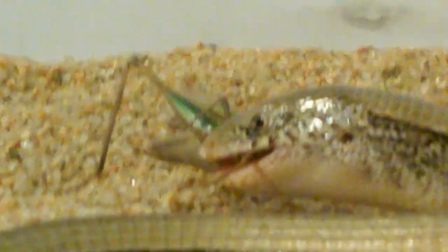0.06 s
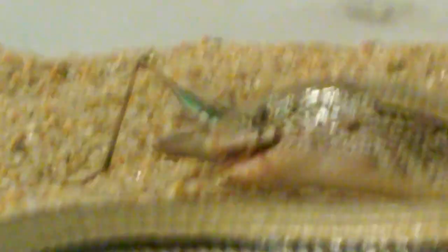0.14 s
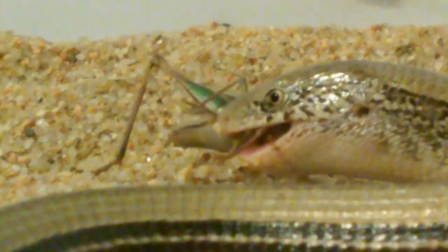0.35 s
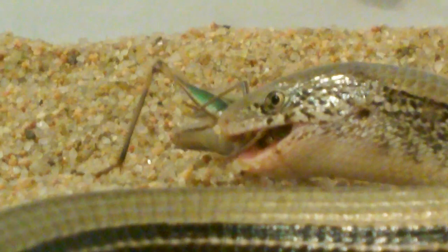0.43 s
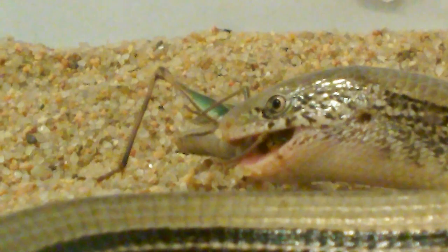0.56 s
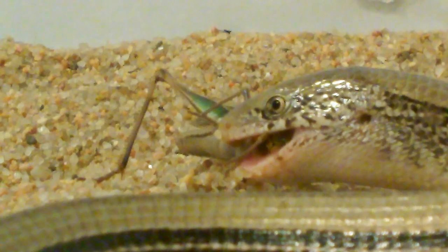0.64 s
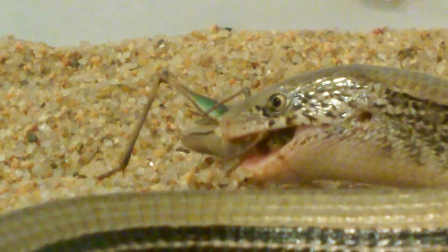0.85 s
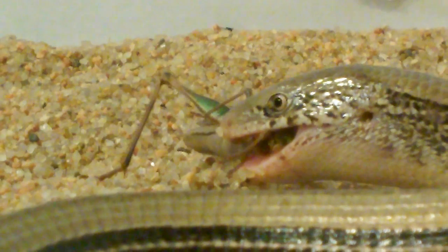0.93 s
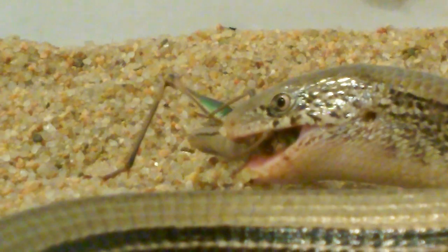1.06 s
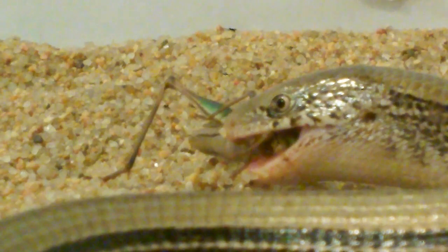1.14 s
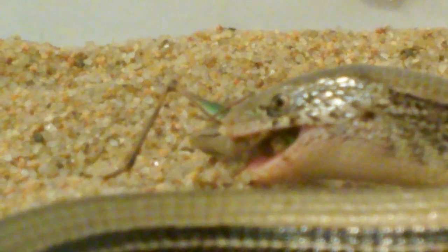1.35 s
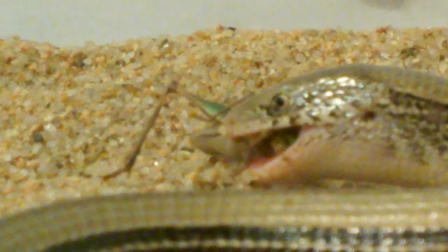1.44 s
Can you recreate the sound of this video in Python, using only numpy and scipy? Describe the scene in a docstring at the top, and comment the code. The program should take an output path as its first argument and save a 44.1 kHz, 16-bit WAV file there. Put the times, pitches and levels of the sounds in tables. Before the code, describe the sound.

Crisp insect shell cracking in a lizard's jaws, snaps and one grinding crunch in a quiet room

```python
"""In a quiet room, close to the microphone, a lizard chews a grasshopper.
Shell plates snap as paired clicks with short rings; a swarm of tiny fractures and jaw thuds makes one crunch.
Between them shell scrapes in the jaws as grainy and smooth coloured noise, and a thin hiss trails the crunch.
Dull mouth taps are short sine pulses. Dim reflections surround snaps and taps, over rumble, hum and hiss."""
import sys
import numpy as np
from scipy import signal
from scipy.fft import rfft, irfft
from scipy.io import wavfile

SR = 44100
rng = np.random.default_rng(int(sys.argv[2]) if len(sys.argv) > 2 else 0)


def wrap_up_sound(samples):
    """Save the sound to the file named by the first command line argument, as 16-bit audio."""
    columns = np.atleast_2d(samples).T
    # keep every value between -1 and 1, then stretch to whole-number steps
    tamed = np.clip(columns, -1, 1)
    steps = np.round(tamed * 32767).astype(np.int16)
    wavfile.write(sys.argv[1], SR, steps)


N = 66150
T = np.arange(N) / SR  # time [s]


def amp(db):
    """Decibels to gain."""
    return 10 ** (np.asarray(db) / 20)


def unit(x):
    """Scales a signal to rms 1."""
    return x / np.sqrt(np.mean(x ** 2) + 1e-20)


def read_spectrum(points, hz):
    """Reads levels in dB between the points, on a log-frequency axis."""
    point_hz, point_db = np.transpose(points)
    return np.interp(np.log(hz + 1), np.log(point_hz + 1), point_db)


def colour(x, points):
    """Filters a signal by a spectrum and brings it to rms 1."""
    hz = np.fft.rfftfreq(len(x), 1 / SR)
    return unit(irfft(rfft(x) * amp(read_spectrum(points, hz)), len(x)))


def noise(points):
    """Coloured noise at rms 1."""
    return colour(rng.standard_normal(N), points)


def grains(per_s, spread_db):
    """Tiny fractures: clicks at random moments, of uneven size and either sign."""
    size = amp(spread_db * np.minimum(rng.exponential(1, N), 4))
    sign = rng.choice([-1, 1], N)
    return size * sign * (rng.random(N) < per_s / SR)


def ramp(start, length):
    """Rises from 0 to 1; with a negative length, falls to 0 at start."""
    return np.clip((T - start) / length, 0, 1)


def add(mix, s, sound):
    """Adds a sound to the mix at a time in seconds."""
    part = mix[round(s * SR):][:len(sound)]
    part += sound[:len(part)]


def pops(rows):
    """Soft, dull blows: sine pulses under a bell-shaped envelope."""
    out = np.zeros(N)
    for s, db, hz, half_length in rows:
        envelope = np.exp(-((T - s) / half_length) ** 2)
        out += amp(db) * np.sin(2 * np.pi * hz * (T - s)) * envelope
    return out


# frequencies [Hz] at which the levels of each snap are given
SNAP_HZ = [100, 250, 420, 700, 1200, 2500, 7000, 14000]
# short modes excited by every snap: (frequency [Hz], level before the snap's own ring level [dB], t60 [s])
RING_MODES = [(268, -48, .09), (350, -53, .1), (395, -53, .08), (463, -55, .075), (545, -57, .06),
              (690, -59, .12), (950, -59, .05)]
SNAP_LOW_HZ = 62  # bass roll-off
PLATE_DB, PLATE_OCTAVES = 5.5, 0.2  # height and width of the plate resonance
SMEAR_S, SMEAR_HZ = 0.0007, 4800  # delay of the lowest bass, and how fast it shrinks up the spectrum
ZING_HZ = 4020
ZING_WIDTHS_HZ = (135, 900)  # a narrow and a wide resonance [Hz]


def snap(levels_db, gap_ms, share, ring_db, plate_hz, size=16384):
    """A double break coloured by its plate: treble arrives first, a narrow zing lingers, modes ring briefly."""
    hz, t = np.fft.rfftfreq(size, 1 / SR), np.arange(size) / SR
    octaves_off = np.log2((hz + 1) / plate_hz)
    plate_db = PLATE_DB * np.exp(-(octaves_off / PLATE_OCTAVES) ** 2)
    bass_cut = (hz + 1) / np.hypot(hz + 1, SNAP_LOW_HZ)
    snap_db = read_spectrum(list(zip(SNAP_HZ, levels_db)), hz) + plate_db
    log_gain = np.log(amp(snap_db) * bass_cut)
    # minimum phase puts the energy right at the onset
    mirrored = np.r_[log_gain, log_gain[-2:0:-1]]
    onset = np.exp(np.conj(signal.hilbert(mirrored)))[:len(hz)]
    # phase is the running sum of the delay at each frequency
    delay_s = SMEAR_S * np.exp(-hz / SMEAR_HZ)
    smear = np.exp(-2j * np.pi * np.cumsum(delay_s) * SR / size)
    # all-pass: delays the sound around the zing without changing its level
    pole = np.prod([ZING_HZ ** 2 - hz ** 2 + 1j * hz * width for width in ZING_WIDTHS_HZ], axis=0)
    zing = np.conj(pole) / pole
    two_breaks = 1 + share * np.exp(-2j * np.pi * hz * gap_ms / 1000)
    ring = sum(amp(db - 60 * t / t60) * np.sin(2 * np.pi * f * t) for f, db, t60 in RING_MODES)
    spectrum = onset * smear * zing * two_breaks * (1 + amp(ring_db) * rfft(ring))
    return irfft(spectrum)[:size // 2]


# shell snaps: (time [s], eight levels, one for each of SNAP_HZ [dB], gap to the second break [ms],
# second break's share of the first [gain], ring level [dB], plate resonance [Hz])
SNAPS = [(.0773, -14, -16.5, -2.5, -13, -13.5, -11.5, -21, -23.5, .30, 0.25, 8.5, 2080),
         (0.1747, -31.5, -29, -39, -5, -38, -27.5, -31, -33, 0.47, 0.27, 13, 2300),
         (0.1857, -5.5, -7, -13.5, -7, -11.5, -23, -22, -34.5, .40, .4, -3, 3100),
         (.5587, -42, -27.5, -41, -32, -45, -51, -34.5, -36.5, 0.287, 0.33, -9, 3300),
         (.6503, -29, -30, -10, -16.5, -22.5, -29.5, -34, -33.5, .9, .2, -4, 2013),
         (0.7215, 3, 7.5, -10, -1.5, -6.5, -7, -13.5, -28, 0.93, 0.18, -5, 2050),
         (0.9477, 5.5, 5.5, -2, 4.5, -9.5, -5, -23, -29, 0.568, 0.23, -8, 2095),
         (.9650, -1.5, -4.5, -2.5, -0.5, 0, -10, -14.5, -26.5, 0.73, 0.35, 3.5, 4370)]


def snaps():
    """Single plates of shell break, each with its own colour."""
    out = np.zeros(N)
    for s, *levels_db, gap_ms, share, ring_db, plate_hz in SNAPS:
        add(out, s, snap(levels_db, gap_ms, share, ring_db, plate_hz))
    return out


# course of the crunch: (start [s], attack [s], start of release [s], end [s])
CRUNCH = (.229, .017, .274, .3015)
# colour of the fractures: (frequency [Hz], relative level [dB])
CRUNCH_TONE = [(20, -26), (60, -8.5), (125, -7), (200, -9.5), (400, -7), (480, -14.5), (630, -4.5),
               (800, -11.5), (1300, -10.5), (3500, -20), (5200, -21.5), (10500, -31.5), (13000, -39),
               (16000, -39.5)]
# jaw thuds as the body gives way in stages:
# (time [s], level before the closing fade [dB], frequency [Hz], half length [s])
THUDS = [(.2492, -6.5, 132, 0.007), (.2668, -11.5, 249, 0.0079), (.2886, -7.5, 140, 0.011)]
CRUNCH_DB = -12  # swarm at full force
FIRST_GIVE = 0.21  # share of the full force with which the crunch sets in
CRUNCH_RISE, CRUNCH_FALL = 1.7, 0.7  # curve exponents
TREBLE_HZ, TREBLE_SHARPEN = 3380, 1.4  # above this the force is raised to this power


def crunch():
    """The body collapses in a swarm of fractures, brightest at full force, and the jaw thuds."""
    start, attack, release, end = CRUNCH
    closing = ramp(end, release - end) ** CRUNCH_FALL
    build = (1 - FIRST_GIVE) * ramp(start, attack) ** CRUNCH_RISE
    force = (FIRST_GIVE * (T > start) + build) * closing
    swarm = colour(grains(per_s=14000, spread_db=1.5), CRUNCH_TONE)
    low = signal.sosfiltfilt(signal.butter(2, TREBLE_HZ, fs=SR, output="sos"), swarm)
    treble = swarm - low
    fractures = low * force + treble * force ** TREBLE_SHARPEN
    return amp(CRUNCH_DB) * fractures + pops(THUDS) * closing


# scrapes of the shell: (start [s], end [s], attack [s], release [s],
# rasp level [dB], rub level [dB], hiss level [dB])
SCRAPES = [(0.095, 0.146, 0.015, 0.053, -66, -65.5, -67.5), (0.181, 0.237, 0.02, .012, -60, -57, -68.5),
           (0.296, 0.384, 0.019, 0.039, -47.5, -44.5, -65), (0.363, 0.477, 0.012, 0.04, -47.5, -46.5, -80),
           (0.467, 0.612, 0.007, 0.048, -74, -70, -98), (0.634, 0.729, 0.016, 0.057, -65, -62, -77),
           (1.107, 1.173, 0.023, 0.029, -90, -76.5, -88)]
# colours of the three layers: (frequency [Hz], relative level [dB])
RASP_TONE = [(100, -29), (900, -17.5), (1250, -6.5), (1550, -0.5), (2150, 1), (2700, -7.5), (3500, -18.5),
             (5000, -34), (16000, -54.5)]
RUB_TONE = [(20, -11), (150, -4.5), (350, 3), (520, 0.5), (730, -4.5), (1040, 1), (1230, -13.5),
            (2000, -28), (16000, -59)]
HISS_TONE = [(500, -14.5), (3000, 1.5), (6000, -4.5), (16000, -13.5)]


def scrapes():
    """Shell slides in the jaws: a fine-grained rasp over a duller rub, with a little hiss."""
    rasp = colour(grains(per_s=10000, spread_db=2.0), RASP_TONE)
    rub, hiss = noise(RUB_TONE), noise(HISS_TONE)
    out = np.zeros(N)
    for start, end, attack, release, rasp_db, rub_db, hiss_db in SCRAPES:
        layers = amp(rasp_db) * rasp + amp(rub_db) * rub + amp(hiss_db) * hiss
        out += ramp(start, attack) * ramp(end, -release) * layers
    return out


# dull taps of the mouth: (time [s], level [dB], frequency [Hz], half length [s])
TAPS = [(0.588, -55.5, 1583, .002), (.5875, -50.5, 588, .002), (0.588, -50, 200, 0.0038),
        (1.041, -62.5, 400, .003), (1.061, -54, 921, .0012), (1.078, -55.5, 877, 0.0011),
        (1.159, -65.5, 879, 0.0017)]


def taps():
    """The mouth taps dully: sine pulses only milliseconds long."""
    return pops(TAPS)


# colour of the thin hiss: (frequency [Hz], relative level [dB])
FIZZ_TONE = [(500, -14), (3000, -4), (8000, -1), (16000, -0.5)]
FIZZ_DB, FIZZ_T60_S = -56.5, 1


def fizz():
    """A thin hiss sets in with the crunch and dies away exponentially after it."""
    start, attack, release, end = CRUNCH
    decay_db = -60 * np.maximum(T - end, 0) / FIZZ_T60_S
    return noise(FIZZ_TONE) * ramp(start, attack) * amp(FIZZ_DB + decay_db)


# colours of the near reflections and the longer tail: (frequency [Hz], relative level [dB])
EARLY_TONE = [(60, -10.5), (250, 0), (750, -1.5), (1300, -15), (3000, -15.5), (15000, -24.5)]
LATE_TONE = [(60, -12), (300, 5), (800, 0.5), (1800, -8), (5000, -8.5), (15000, -2)]
EARLY_DB, EARLY_T60_S = -26, 0.16
LATE_DB, LATE_T60_S = -32.5, 0.4


def room(x):
    """Dull nearby reflections and a fainter, longer tail: convolution with decaying coloured noise."""
    early = amp(EARLY_DB) * unit(noise(EARLY_TONE) * amp(-60 * T / EARLY_T60_S))
    late = amp(LATE_DB) * unit(noise(LATE_TONE) * amp(-60 * T / LATE_T60_S))
    response = (early + late) / np.sqrt(N)  # the levels above become total energies
    return signal.fftconvolve(x, response)[:N]


# course of the low rumble: (time [s], level [dB])
RUMBLE_LEVEL = [(0, -74.5), (.16, -75), (.2, -44), (.29, -43.5), (.34, -52), (.42, -67.5), (.455, -44),
                (.49, -64), (.68, -64), (.76, -87), (.92, -85.5), (.99, -87), (1.08, -95), (1.5, -89)]
# colours of the rumble and the steady hiss: (frequency [Hz], relative level [dB])
RUMBLE_TONE = [(15, -8.5), (60, -3.5), (110, -6.5), (200, -11), (500, -30.5), (2000, -56)]
FLOOR_TONE = [(20, -3.5), (60, -14.5), (120, -14), (180, -11), (245, -13.5), (290, -13.5), (714, -15.5),
              (1000, -19), (3000, -23.5), (16000, -23.5)]
# steady hum tones: (frequency [Hz], rms level [dB])
HUM = [(177.6, -80.5), (242.2, -84), (333.8, -93.5), (662.1, -98), (721.4, -93.5)]
FLOOR_DB = -75.5


def background():
    """Low rumble that swells and sinks, a faint hum of steady sines, and constant noise as hiss."""
    hum = sum(amp(db) * np.sqrt(2) * np.sin(2 * np.pi * (f * T + rng.random())) for f, db in HUM)
    hiss = amp(FLOOR_DB) * noise(FLOOR_TONE)
    rumble = noise(RUMBLE_TONE) * amp(np.interp(T, *np.transpose(RUMBLE_LEVEL)))
    return hum + hiss + rumble


def scene():
    """All the sounds of chewing; only the snaps and taps excite the room."""
    clicks = snaps() + taps()
    chewing = clicks + room(clicks) + crunch() + scrapes() + fizz()
    return (chewing + background())[None]


EDGE_HZ = 15900  # upper band limit


def record(dry):
    """The recorder clips at full scale, then a steep low-pass limits the band."""
    low_pass = signal.firwin(511, EDGE_HZ, window=("kaiser", 9), fs=SR)
    return signal.oaconvolve(np.clip(dry, -1, 1), low_pass[None], "same")


dry = scene()
out = record(dry)
wrap_up_sound(out)
```